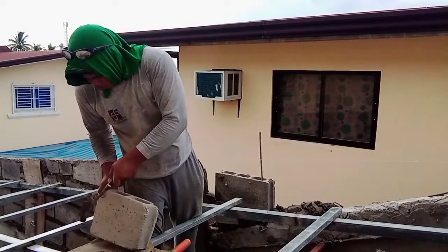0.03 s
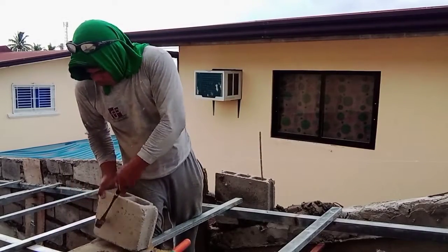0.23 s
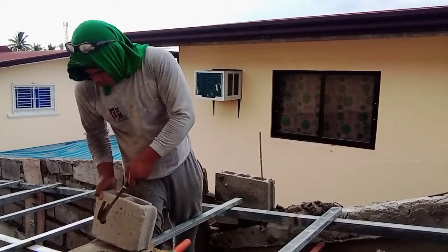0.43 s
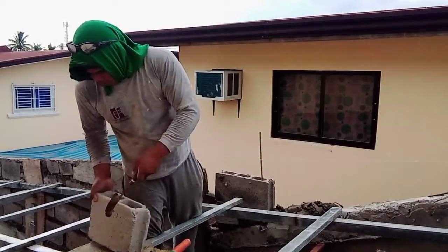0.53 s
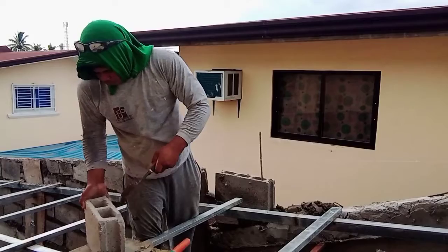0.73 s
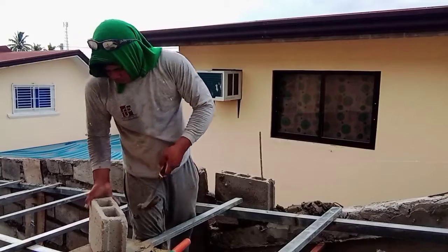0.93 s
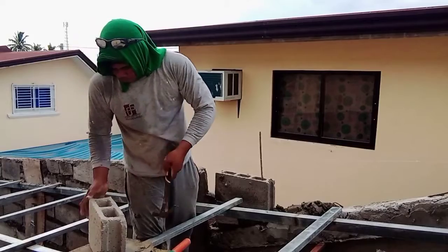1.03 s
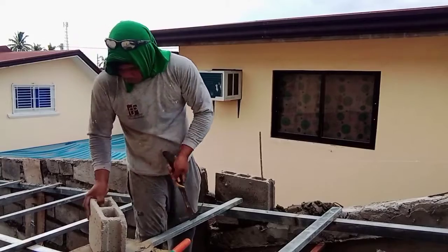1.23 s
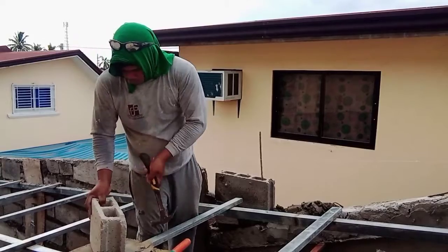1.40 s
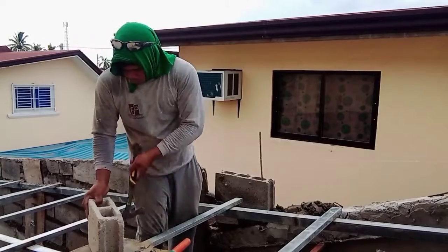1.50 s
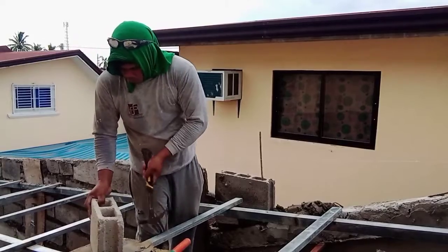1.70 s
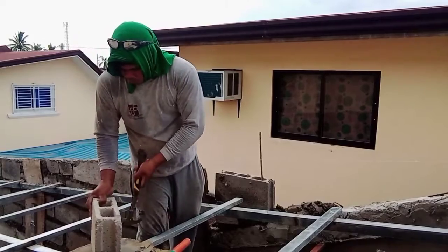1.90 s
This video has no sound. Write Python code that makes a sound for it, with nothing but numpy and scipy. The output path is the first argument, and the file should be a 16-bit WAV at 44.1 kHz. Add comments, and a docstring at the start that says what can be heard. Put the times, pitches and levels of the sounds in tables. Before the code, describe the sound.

A hollow concrete block is struck with a trowel, dragged and knocked into place.

```python
"""A hollow concrete block, close to one microphone in a yard, is struck with a trowel, dragged round on
its gritty bed and knocked down into place. Each knock is a brief crunch over the dull ring of the block;
the steel blade rings on, the support booms and the house walls throw the knock back.
Small taps and crumbling grit come in between, over faint outdoor air and wind on the microphone."""
import sys
import numpy as np
from scipy import signal
from scipy.fft import rfft, irfft, next_fast_len
from scipy.io import wavfile
from scipy.ndimage import uniform_filter1d

SR = 44100
rng = np.random.default_rng(int(sys.argv[2]) if len(sys.argv) > 2 else 0)


def waveform_to_disk(signal):
    """Save audio, clipped to [-1, 1], as 16-bit WAV at the path in sys.argv[1]."""
    frames = np.transpose(np.atleast_2d(signal))
    scaled = np.clip(frames, -1, 1) * 32767
    samples = np.round(scaled).astype(np.int16)
    wavfile.write(sys.argv[1], SR, samples)


N = 85995
T = np.arange(N) / SR

# modes of the hollow block: f/Hz, relative level/dB, t60/s
BLOCK_MODES = [(151, -22, 0.24), (217, -26.5, 0.11), (352, -11.5, 0.042), (541, 0, 0.07),
               (629.7, -6.5, 0.031), (1221, -22, 0.14), (1536, -16, 0.017)]

def contacts(rows, colour, grit_t60, attack_s):
    """Each contact crushes grit while the block's modes swell and die; returns ring and crunch."""
    body, crush = np.zeros(N), np.zeros(N)
    for start, ring_db, pitch, sustain, grit_db, hold in rows:
        age = np.maximum(T - start, 0)
        span = slice(int(start * SR), int(start * SR) + SR // 4)
        swell = 1 - np.exp(-(age[span] / attack_s) ** 2)
        for k, (hz, db, t60) in enumerate(BLOCK_MODES):
            release = burst(start, attack_s, t60 * sustain)[span]
            tone = np.sin(2 * np.pi * hz * pitch * age[span])
            body[span] += (-1) ** k * from_db(ring_db + db) * swell * release * tone
        rise = np.minimum(age / (0.49 * attack_s), 1)
        crush += from_db(grit_db) * burst(start, hold, grit_t60) * rise
    return body, coloured(crush * grains(per_s=12000, spread_db=2.5), colour)

# the trowel hits: t/s, ring level/dB, pitch ratio, ring length ratio, grit level/dB, grit hold/s
BLOW = [(0.2257, -5, 1.077, 0.32, -18, 0.0071)]
# the crunch as picked up, with the microphone's resonance near 15.5 kHz: f/Hz, relative level/dB
BLOW_COLOUR = [(40, -11.5), (110, 1), (400, 4), (750, 2.5), (1000, -4.5), (1900, -0.5), (2700, -0.5),
               (3150, -16.5), (3700, -1), (5000, -21), (6300, -27.5), (8000, -60), (13000, -57),
               (15500, -34)]

def blow():
    """The trowel strikes the block near the microphone: a sharp crunch and a short ring."""
    return sum(contacts(BLOW, BLOW_COLOUR, grit_t60=0.024, attack_s=0.0018))

# the block lands: columns as in BLOW
LANDING = [(1.5385, -10, 1.014, 0.82, -29, 0.005)]
# the crunch as picked up, with the microphone's resonance near 15.5 kHz: f/Hz, relative level/dB
LANDING_COLOUR = [(40, -4), (110, 7), (300, 12), (600, -20.5), (850, -4), (1500, -1.5), (2000, -1),
                  (2700, -5), (3600, -4.5), (4200, -12), (5000, -14.5), (6300, -23), (8000, -41),
                  (13000, -48), (15500, -29.5)]

def landing():
    """The block comes down on its bed with a deeper, longer crunch."""
    return sum(contacts(LANDING, LANDING_COLOUR, grit_t60=0.11, attack_s=0.0016))

# upper resonances of the block: f/Hz, relative level/dB
UPPER_MODES = [(935, 5.5), (1240, 4.5), (1420, 3.5), (1650, 0), (2060, -22), (2590, -0.5), (3080, 0.5),
               (3300, 1), (3650, 4), (3910, 1.5), (4400, 1), (4720, -1), (5720, -8.5), (6550, -20.5)]

def through_block(grit, t60=0.023):
    """Rubbing reaches the microphone partly direct, partly through the block's upper resonances."""
    rung = sum((-1) ** k * from_db(db) * ring(grit, hz, t60) for k, (hz, db) in enumerate(UPPER_MODES))
    return 0.45 * grit + rung * 4 * np.log(1000) / (t60 * SR)

def glancing(rows, colour, grit_t60, attack_s):
    """A glancing contact, whose grit rings through the block."""
    body, grit = contacts(rows, colour, grit_t60, attack_s)
    return body + through_block(grit)

# course of the grinding: t/s, level/dB
GRINDING = [(0.632, -75), (0.648, -41.5), (0.675, -36.5), (0.70, -36.5), (0.745, -32.5), (0.775, -40),
            (0.80, -32.5), (0.83, -44.5), (0.865, -50.5), (0.91, -64)]
# the grinding as picked up, with the microphone's resonance near 15.5 kHz: f/Hz, relative level/dB
GRINDING_COLOUR = [(60, -59), (220, -9.5), (380, 17.5), (600, 13.5), (900, 0.5), (1500, -6), (2200, 10),
                   (2700, 0), (3900, 0), (5000, -3), (6400, -3), (8000, -21.5), (13500, -27), (15500, -9)]

def grinding():
    """The dragged block breaks sand grains under it."""
    sand = level(GRINDING) * during(GRINDING) * grains(per_s=2900, spread_db=2.5)
    return through_block(coloured(sand, GRINDING_COLOUR))

# course of the judder under the drag: t/s, level/dB
JUDDER = [(0.71, -62), (0.75, -48.5), (0.78, -38), (0.815, -58), (0.85, -45), (0.89, -50), (0.93, -75)]

def judder(slips_per_s=150):
    """The block moves in uneven slips that shake a low note from its support."""
    wander = rms_one(uniform_filter1d(rng.standard_normal(N), size=300))
    slip_count = np.cumsum(slips_per_s * (1 + 0.23 * wander)) / SR
    slips = np.diff(np.floor(slip_count), prepend=0)
    shudder = rms_one(ring(slips - slips.mean(), hz=192, t60=0.092))
    return shudder * level(JUDDER) * during(JUDDER)

# catches during the drag: columns as in BLOW
JOLTS = [(0.669, -22.5, .65, 1.17, -43.5, 0.015), (0.727, -21, .76, 0.55, -45.5, 0.012),
         (0.736, -24, 1.1, 1.2, -36, 0.0037), (0.749, -37, 0.74, 1.0, -30, 0.0028),
         (0.7945, -17.5, 0.98, 0.18, -22, 0.0019)]
# the grit as picked up, with the microphone's resonance near 15.5 kHz: f/Hz, relative level/dB
JOLT_COLOUR = [(60, -44), (300, -15.5), (600, -7), (1200, -12), (2100, -10), (2700, -16), (3900, 5.5),
               (5000, -1.5), (6400, -5), (8000, -36), (13500, -30), (15500, -6)]

def jolts():
    """The dragged block catches several times, in knocks with little bass."""
    return cut(glancing(JOLTS, JOLT_COLOUR, grit_t60=0.0074, attack_s=0.0057), "highpass", hz=330)

# taps on the block: columns as in BLOW
TAPS = [(0.962, -52, 1, 1.0, -52, 0.024), (1.012, -72, 1.2, 1.0, -61, .018),
        (1.069, -56.5, 1.17, 1.0, -62.5, 0.0099), (1.308, -70.5, 1.03, 1.0, -65, 0.008),
        (1.410, -47, .93, 2.2, -45, 0.0069)]
# the grit as picked up, with the microphone's resonance near 15.5 kHz: f/Hz, relative level/dB
TAP_COLOUR = [(60, -28.5), (300, -12), (550, -6), (900, -8.5), (1300, -9), (2100, -9.5), (2650, 3.5),
              (3500, -1.5), (4200, -10), (5100, -1.5), (6400, -5.5), (8000, -33.5), (13500, -22.5),
              (15500, -4)]

def taps():
    """Light taps tick on the gritty block and barely ring it."""
    return glancing(TAPS, TAP_COLOUR, grit_t60=0.032, attack_s=0.0028)

# contacts after the landing: columns as in BLOW
SETTLING = [(1.665, -37.5, 0.81, 1, -43.5, 0.012), (1.679, -41, 0.93, 0.95, -42.5, 0.0093),
            (1.710, -41.5, 0.79, 0.47, -52.5, 0.0063), (1.754, -76, 1.0, 0.85, -57.5, 0.0063)]
# the grit as picked up, with the microphone's resonance near 15.5 kHz: f/Hz, relative level/dB
SETTLING_COLOUR = [(60, 0), (300, 13), (500, 12.5), (750, -17), (1100, 9.5), (1700, -8), (2700, 6),
                   (3700, -1.5), (5000, -3), (6400, -2.5), (8000, -28), (13500, -29.5), (15500, -13)]

def settling():
    """The block rocks on its bed and comes to rest."""
    return glancing(SETTLING, SETTLING_COLOUR, grit_t60=0.032, attack_s=0.0028)

# modes of the support under the block: f/Hz, relative level/dB, t60/s
SUPPORT_MODES = [(135.1, -8.5, .16), (168.7, -2.5, 0.24), (214.5, -1.5, .26), (311, 4.5, .22)]
# pushes from the blow and the landing: t/s, level/dB
SHAKES = [(0.232, -42.5), (1.547, -32)]

def support():
    """The two heavy knocks set the support booming."""
    pushes = np.zeros(N)
    for start, db in SHAKES:
        pushes[int(start * SR)] = from_db(db)
    pushes = cut(pushes, "lowpass", hz=500)  # a soft contact
    return sum((-1) ** k * from_db(db) * ring(pushes, hz, t60)
               for k, (hz, db, t60) in enumerate(SUPPORT_MODES))

# modes of the steel blade: f/Hz, relative level/dB, t60/s
BLADE_MODES = [(478.5, -2.5, 0.32), (691, 0, 0.47), (744, -1, 0.43), (773, -6, 0.27), (1296, -5.5, 0.19),
               (1775, -12.5, .22), (2020, -10, .2), (2090, -13, 0.29), (2393, -1, 0.2), (2555, 0, 0.17),
               (3150, -6, 0.48), (3200, -7.5, 0.087), (3690, 1, 0.2), (3707, -10, .17)]
# touches on the blade: t/s, level/dB, tilt about 2 kHz/(dB per octave)
CLINKS = [(0.0, -61, -1.5), (0.094, -71.5, 16.5), (0.2265, -37, -2), (0.963, -66, 14), (1.02, -74, 13),
          (1.07, -75.5, 18), (1.412, -55.5, 6)]

def trowel():
    """The blade rings on after each touch; the lightest touches favour its upper modes."""
    starts, hit_db, tilt = np.transpose(CLINKS)
    samples = (starts * SR).astype(int)
    blade = np.zeros(N)
    for hz, db, t60 in BLADE_MODES:
        strength = from_db(hit_db + db + tilt * np.log2(hz / 2000))
        touches = np.zeros(N)
        touches[samples] = strength * rng.choice([-1, 1], len(starts))
        blade += ring(touches, hz, t60)
    return blade

# flying crumbs: t/s, hold/s, level/dB
SPRAY = [(0.231, 0.019, -47)]
# the crumbs as picked up, with the microphone's resonance near 15.5 kHz: f/Hz, relative level/dB
SPRAY_COLOUR = [(500, -26.5), (2500, -1.5), (4900, 9.5), (6200, -8), (8000, -26.5), (13000, -28.5),
                (15500, -15.5)]

def spray():
    """Crumbs of concrete patter away after the blow."""
    envelope = sum(from_db(db) * burst(start, hold, t60=0.15) for start, hold, db in SPRAY)
    return coloured(envelope * grains(per_s=4000, spread_db=1.5), SPRAY_COLOUR)

# tones of the squeak: t/s, length/s, f/Hz, level/dB
SQUEAKS = [(0.164, 0.06, 1270, -55), (0.185, .028, 3013, -60.5)]

def squeak():
    """A faint, pure squeak swells and fades just before the blow."""
    tones = np.zeros(N)
    for start, length, hz, db in SQUEAKS:
        swell = np.sin(np.pi * np.clip((T - start) / length, 0, 1)) ** 2
        tones += from_db(db) * swell * np.sin(2 * np.pi * hz * T)
    return tones

# shifts of loose grit: t/s, hold/s, level/dB
RUSTLES = [(0.08, 0.05, -62), (0.159, 0.047, -60.5), (0.456, 0.084, -61), (0.563, 0.026, -60),
           (1.365, 0.096, -62), (1.76, 0.089, -62.5), (1.834, 0.057, -61)]
# the grit as picked up, with the microphone's resonance near 15.5 kHz: f/Hz, relative level/dB
RUSTLE_COLOUR = [(200, -9), (1200, -23), (2300, -6.5), (3400, -4.5), (4100, -14), (4800, 0), (6600, -7),
                 (8000, -23.5), (13500, -22), (15200, -2.5)]

def rustles(rise_s=0.03):
    """Loose grit shifts faintly on the block under the hand."""
    envelope = sum(from_db(db) * burst(start, hold, t60=0.098) * np.clip((T - start) / rise_s, 0, 1)
                   for start, hold, db in RUSTLES)
    return through_block(coloured(envelope * grains(per_s=2500, spread_db=3.5), RUSTLE_COLOUR))

# reverberation of the yard by band: f/Hz, level/dB, t60/s
YARD = [(100, -2.5, .3), (200, -3, 0.16), (356, -1, 0.34), (580, -9.5, 0.27), (750, -1, 0.35),
        (1200, 2, 0.28), (2700, -3.5, 0.29), (3980, -0.5, 0.2), (8000, -4.5, 0.35), (16000, -9, 0.25)]

def yard(x, delay_s=0.011):
    """Dense reflections from nearby walls, dying band by band, with a faint longer tail."""
    noise = rfft(rng.standard_normal(N))
    log_hz = np.log(np.arange(N // 2 + 1) * SR / N + 1)
    centres = np.log([row[0] for row in YARD])
    response = np.zeros(N)
    for share, (_, db, t60) in zip(np.eye(len(YARD)), YARD):
        band = irfft(noise * np.interp(log_hz, centres, share), N)
        tail = from_db(-36) * burst(delay_s, hold=0, t60=t60 / 0.34)
        decay = burst(delay_s, hold=0.02, t60=t60) + tail
        response += from_db(db) * band * decay / np.sqrt(np.sum(decay ** 2))
    return signal.fftconvolve(x, response)[:N]

# the air as picked up, with the microphone's resonance near 15.5 kHz: f/Hz, relative level/dB
AIR_COLOUR = [(40, -33), (95, -8.5), (175, -16), (360, -25), (520, -18.5), (1100, -33), (1700, -30),
              (2100, -32.5), (3900, -34), (5600, -42), (8000, -61), (13000, -60.5), (15500, -54.5)]

def air():
    """Outdoor air lies faint and steady behind the work."""
    return from_db(-66.5) * coloured(rng.standard_normal(N), AIR_COLOUR)

# gusts at the microphone: t/s, level/dB
GUSTS = [(0.0, -43), (0.06, -67), (0.36, -63), (0.5, -74), (0.85, -69), (1.12, -71), (1.27, -70.5),
         (1.315, -53.5), (1.36, -64), (1.43, -72), (1.5, -58), (1.78, -63), (1.825, -44), (1.87, -62.5),
         (1.95, -47)]
# the rumble as picked up: f/Hz, relative level/dB
WIND_COLOUR = [(25, -22), (50, -10.5), (78, 11), (105, -5.5), (170, -19), (500, -32), (2000, -77)]

def wind():
    """Gusts rumble right on the microphone."""
    return level(GUSTS) * coloured(rng.standard_normal(N), WIND_COLOUR)

# spectrum of the opening echo: f/Hz, relative level/dB
ECHO_COLOUR = [(59, -35), (100, -5), (295, -22), (354, 2.5), (711, -6.5), (794, -2), (1350, -14.5),
               (1850, -6), (2260, -5), (2610, -37), (3700, -4.5), (4130, -18.5), (8000, -58),
               (10400, -97.5), (17600, -120)]

def dying_echo():
    """A faint echo is already dying away in the yard at the start."""
    return from_db(-49.5) * burst(0, hold=0, t60=0.36) * coloured(rng.standard_normal(N), ECHO_COLOUR)

def from_db(db):
    """Decibels to gain."""
    return 10 ** (np.asarray(db) / 20)

def rms_one(x):
    """Scale to rms 1."""
    return x / np.sqrt(np.mean(x ** 2) + 1e-20)

def level(rows):
    """Gain over time from (t/s, level/dB) points."""
    return from_db(np.interp(T, *np.transpose(rows)))

def during(rows):
    """Gate, open from the first row's time to the last."""
    return (T > rows[0][0]) * (T < rows[-1][0])

def burst(start, hold, t60):
    """Envelope: sudden start, hold, exponential release; times in seconds."""
    return (T >= start) * np.exp(-np.log(1000) * np.maximum(T - start - hold, 0) / t60)

def grains(per_s, spread_db):
    """Random clicks of sand grains breaking; rms 1."""
    sizes = from_db(spread_db * np.minimum(rng.exponential(1, N), 4)) * rng.choice([-1, 1], N)
    return rms_one(sizes * (rng.random(N) < per_s / SR))

def ring(x, hz, t60):
    """A unit click sets a sine of height 1 ringing."""
    radius, angle = np.exp(-np.log(1000) / (t60 * SR)), 2 * np.pi * hz / SR
    return signal.lfilter([0, np.sin(angle)], [1, -2 * radius * np.cos(angle), radius ** 2], x + 1e-18)

def cut(x, kind, hz):
    """Second-order highpass or lowpass."""
    return signal.sosfilt(signal.butter(2, hz, kind, fs=SR, output="sos"), x)

def coloured(x, points):
    """Causal filter shaped by (f/Hz, level/dB) points; keeps the power of white noise."""
    hz, db = np.transpose(points)
    size = 2 * next_fast_len(N)
    log_hz = np.log(np.arange(size // 2 + 1) * SR / size + 1)
    gain = rms_one(from_db(np.interp(log_hz, np.log(hz), db)))
    # minimum phase, so nothing sounds ahead of a knock
    cepstrum = irfft(np.log(gain))
    cepstrum[1:size // 2] *= 2
    cepstrum[size // 2 + 1:] = 0
    return irfft(rfft(x, size) * np.exp(rfft(cepstrum)))[:N]

def scene():
    """Blow, drag, taps and landing up close, with the yard behind them; mono."""
    struck, landed = blow(), landing()
    dragged = grinding() + judder() + jolts()
    tapped = taps() + settling()
    walls = yard(from_db(-2) * struck + from_db(-3.5) * landed
                 + from_db(-8) * dragged + from_db(-8.5) * tapped)
    block = struck + landed + dragged + tapped
    small_sounds = support() + spray() + trowel() + squeak() + rustles()
    background = air() + wind() + dying_echo()
    return (block + small_sounds + walls + background)[None]

def record(dry):
    """The microphone's signal loses its deep bass, has its peaks rounded and its top cut."""
    ceiling, top_hz = 0.5, 15950
    rounded = ceiling * np.tanh(cut(dry, "highpass", hz=68) / ceiling)
    return signal.sosfilt(signal.ellip(10, .5, 70, top_hz, fs=SR, output="sos"), rounded)

dry = scene()
out = record(dry)
waveform_to_disk(out)
```